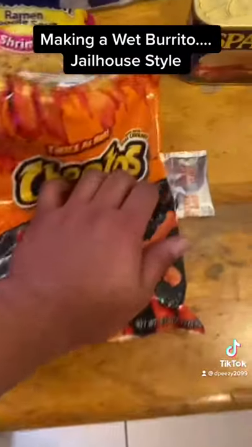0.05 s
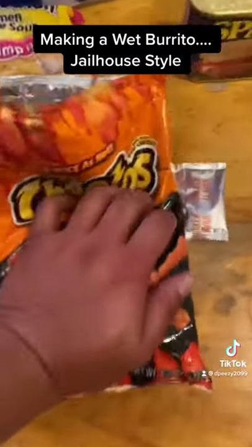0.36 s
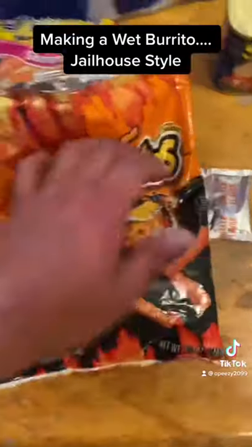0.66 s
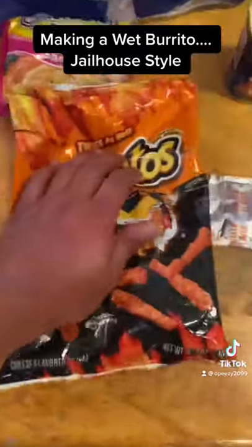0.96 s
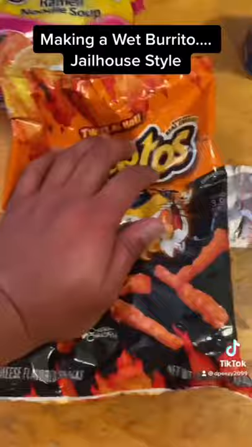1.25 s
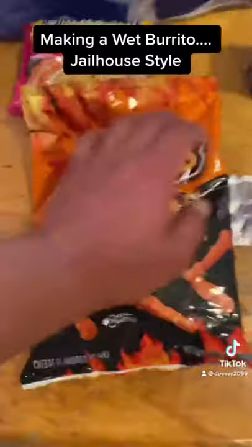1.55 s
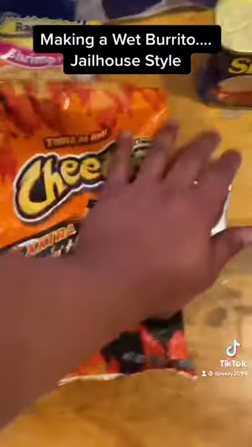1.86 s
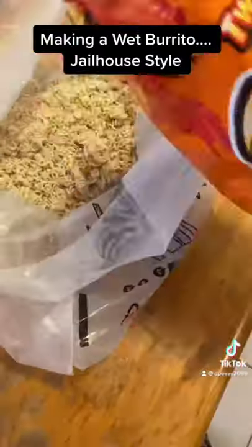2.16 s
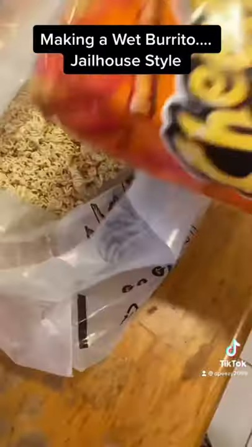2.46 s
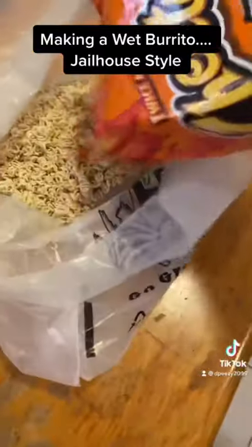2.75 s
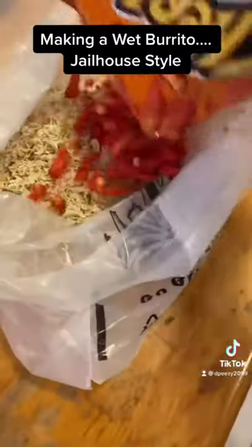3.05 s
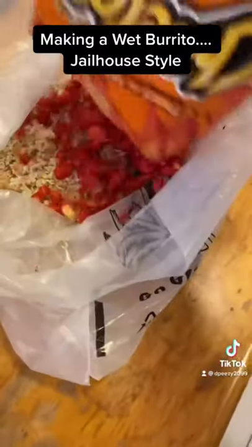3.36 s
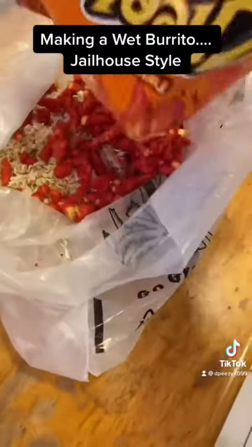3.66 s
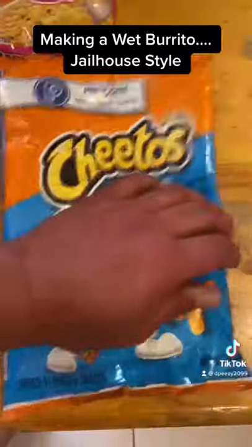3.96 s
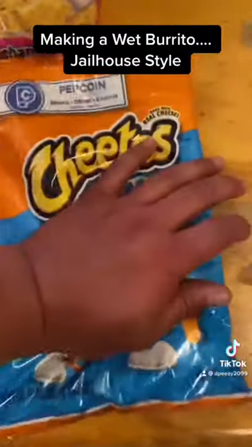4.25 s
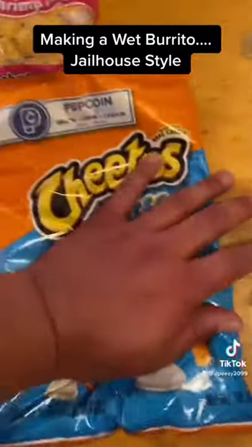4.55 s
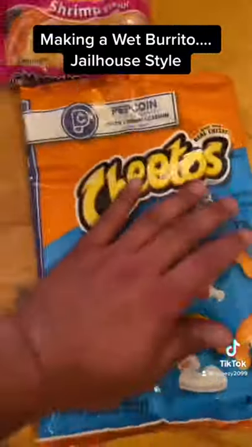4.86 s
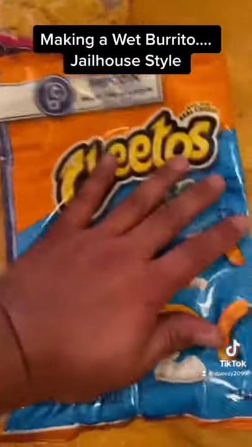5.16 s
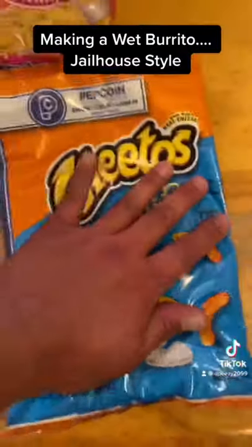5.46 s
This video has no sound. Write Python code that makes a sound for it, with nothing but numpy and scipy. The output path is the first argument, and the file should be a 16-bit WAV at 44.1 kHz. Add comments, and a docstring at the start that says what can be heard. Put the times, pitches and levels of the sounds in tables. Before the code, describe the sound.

A palm crushes chips inside a foil-plastic bag on a wooden table, in quick, uneven pushes full of crunches, sharp snaps, crinkling and soft low thuds. After a tiny gap, crumbs slide out and patter more softly onto dry noodles in a plastic bag. The pour fades, and a second bag is crushed with a similar crunch and crackle. Everything is close to the microphone in a small room.

```python
"""Corn chips fracture in swarms as a palm crushes them inside a foil-plastic bag on a wooden table.
Each break is an impulse that rings briefly: bright where chips lie free, muffled under the palm.
The collapse excites the low modes of the table, while creases in the film buckle and crackle.
One bag is crushed, crumbs patter into a plastic bag, and a second bag is crushed.
The three episodes are heard close up in a small room, with short silences between them."""
import sys
import numpy as np
from scipy import signal
from scipy.fft import rfft, irfft
from scipy.io import wavfile
from scipy.ndimage import uniform_filter1d

SR = 44100
rng = np.random.default_rng(int(sys.argv[2]) if len(sys.argv) > 2 else 0)


def put_to_file(sound):
    """Save the sound as 16-bit audio at rate SR, in the file named by the first command-line argument."""
    columns = np.atleast_2d(sound).T  # one column per channel
    safe = np.clip(columns, -1, 1)
    whole_steps = np.round(safe * 32767)
    wavfile.write(sys.argv[1], SR, whole_steps.astype(np.int16))


N = 246695
TIME = np.arange(N) / SR

# First crush, pour and second crush. Each row: start in seconds, end in seconds.
EPISODES = [(0, 2.193), (2.281, 3.893), (3.978, 5.559)]
# Spectra of the room noise, the film, the poured crumbs and the chips in each bag.
# Each row: frequency in Hz, relative level in dB.
ROOM_SPECTRUM = [(25, -9.5), (45, 10), (65, 14), (100, -1.5), (135, 4.5), (230, 1), (400, -5.5),
                 (540, -8.5), (650, -3.5), (900, -19), (2600, -13.5), (6000, -37), (10000, -44),
                 (15000, -53.5)]
FILM_SPECTRUM = [(7000, 6), (8500, 0), (10000, -7.5), (11200, -26), (12500, 1), (14000, -0.5),
                 (16000, -6.5)]
POUR_SPECTRUM = [(47, -36), (80, -1), (218, 2), (353, -5.5), (404, -3.5), (489, -5.5), (979, -3.5),
                 (1190, 0), (1440, -1.5), (2160, -5), (2520, -2.5), (4160, -9), (4850, -6), (8000, -19),
                 (10400, -49), (17600, -120)]
FIRST_SPECTRUM = [(150, -35), (250, -1.5), (321, -2.5), (475, -0.5), (546, -4), (645, -15), (701, 4),
                  (763, 4.5), (1130, -9.5), (1640, -7), (1910, -12), (3790, -14), (4300, -11), (5450, -17),
                  (7000, -18.5), (9100, -48), (15400, -120)]
SECOND_SPECTRUM = [(150, -35), (250, 3), (326, 1), (488, 7), (593, 3.5), (645, -4.5), (763, 10.5),
                   (1110, -10.5), (1370, -7.5), (1670, -12), (2140, -10.5), (3120, -10.5), (3740, -11.5),
                   (4800, -12), (7000, -15.5), (9100, -45), (15400, -120)]
# Early reflections from table and walls. Each row: delay in seconds, gain in dB.
REFLECTIONS = [(.0013, -51), (.0047, -23.5), (.0083, -27.5)]
# Modes of the table top with the bag's air cushion, and of the bag that receives the crumbs.
# Each row: frequency in Hz, bandwidth in Hz, relative gain in dB.
TABLE_MODES = [(73.8, 28, -11.5), (119.8, 9.9, 1.5), (134.9, 6.6, 1.5), (206, 14, -2.5), (225, 31, -11.5)]
RECEIVING_BAG_MODES = [(1190, 110, -6.5), (2590, 170, -3), (3080, 240, -3.5), (4700, 320, -16)]
# The stream of crumbs as the bag tips and drains. Each row: time in seconds, relative level in dB.
CRUMB_FLOW = [(2.29, -50), (2.41, -47), (2.62, -28.5), (2.87, -26), (3.16, -29.5), (3.42, -37), (3.6, -49),
              (3.88, -65.5)]
# Clumps that tumble out at once. Each row: start in seconds, relative level in dB.
CLUMPS = [(2.463, -32.5), (2.521, -27), (3.185, -21.5), (3.225, -26.5), (3.465, -41.5), (3.805, -52.5)]
# The loudest single snaps of chip or crease.
# Each row: start in seconds, relative level in dB, pitch in Hz, relative strength of the tick in dB.
LOUD_SNAPS = [(.0345, -23, 6000, -1), (.038, -15, 2500, -10), (0.13, -14, 2100, -8),
              (0.2014, -12.5, 2340, -5), (.252, -10.5, 1900, -14), (.355, -22, 6440, -2),
              (.401, -27, 6900, 7), (0.407, -17, 3400, -15), (0.4674, -20.5, 3846, -4),
              (0.5391, -10, 3535, -16), (0.733, -28, 3330, -23.5), (0.8168, -20, 4400, -22),
              (.8372, -12, 1700, -25), (0.8783, -17.5, 2973, -1.5), (0.953, -20, 2360, -5.5),
              (1.0, -20.5, 2440, 7), (1.058, -16, 4500, -1), (1.077, -12, 1700, -15),
              (1.097, -12.5, 3035, -7.5), (1.312, -32, 6510, -1), (1.33, -19.5, 2793, -20),
              (1.354, -27, 4216, -1), (1.39, -17.5, 3700, -10), (1.4788, -15, 2970, -10.5),
              (1.495, -20, 3530, -18), (1.5276, -19.5, 3200, -9), (1.603, -28.5, 2635, -11),
              (1.726, -26.5, 1100, -26), (1.768, -15.5, 4201, -10), (1.7767, -11.5, 3694, -6.5),
              (1.84, -11.5, 3770, -6.5), (1.9135, -10.5, 4708, -7), (1.9808, -11.5, 4432, -9.5),
              (2.154, -28, 3692, -11), (2.174, -26.5, 4560, -9), (2.446, -30.5, 2660, -19),
              (2.47, -22, 2300, -35), (2.486, -36, 2700, -23), (2.6087, -24, 2800, -27),
              (2.7308, -23, 1760, -26), (3.194, -25, 3080, -25), (3.458, -29, 2300, -26),
              (3.658, -40, 2380, -28), (4.0375, -22, 2900, -18), (4.079, -14.5, 3200, -32),
              (4.089, -20, 3440, -9), (4.1915, -25, 6200, -5), (4.2338, -21.5, 3550, -9.5),
              (4.3355, -13.5, 2130, -13), (4.5408, -19.5, 3900, -14), (4.656, -17.5, 2620, -16.5),
              (4.668, -26.5, 6600, -9), (4.836, -33, 3667, -12), (4.853, -27, 3924, -21),
              (5.0566, -19.5, 3322, -10.5), (5.1122, -14.5, 4500, -5), (5.128, -18, 3903, -6),
              (5.231, -19.5, 6900, 2), (5.341, -19.5, 2668, -2), (5.3966, -22, 3502, -5.5),
              (5.476, -21, 2418, -30), (5.51, -19, 2310, -27)]
# Shoves of the palm on each bag. Each row: start, rise and hold in seconds, then four relative levels
# in dB: free chips, muffling (buried over free chips), thud over buried chips, film over free chips.
FIRST_SHOVES = [(-.02, 0.031, 0.083, -26.5, 1, -3, -13.5), (.112, 0.0099, 0.047, -21.5, -1, -0.5, -10.5),
                (.18, 0.027, 0.054, -18, -1, -8, -10), (.25, 0.013, 0.063, -17, 1, -6.5, -9),
                (.42, 0.031, 0.06, -30.5, 0.5, -1.5, -10), (.52, .012, 0.026, -24.5, 4, -16, -12.5),
                (.57, 0.014, 0.034, -26, -2, -5.5, -11), (.675, 0.027, 0.042, -37, 5, 0, -14.5),
                (.8, 0.038, .025, -28, -0.5, -10, -13), (.868, 0.0097, .03, -21, -6, -7.5, -11.5),
                (.92, 0.01964, .04, -27, -1, -2.5, -11), (.988, .012, 0.048, -24, 0, -1.5, -10),
                (1.045, 0.031, 0.13, -20, 0, -2.5, -12.5), (1.21, .02, 0.11, -33, 4, -7, -14),
                (1.38, 0.019, 0.031, -26, 4, -6, -8.5), (1.45, .03, 0.0188, -26, -2.5, -4, -11.5),
                (1.515, 0.023, .055, -37, 8, -2.5, -14), (1.735, 0.039, .012, -22, -6.5, -4, -9),
                (1.8, .05, .115, -17.5, -1, 2, -10), (1.99, 0.023, .024, -20, -1, 1.5, -11.5),
                (2.1, 0.043, 0.048, -34, 2, -2, -9.5)]
SECOND_SHOVES = [(3.96, .11, .1, -27.5, -5, -4.5, -10), (4.21, 0.086, 0.055, -21, -2, -1.5, -9.5),
                 (4.355, .025, .022, -26, 0, 2.5, -5), (4.4, 0.022, .055, -35, 7, -17, -11),
                 (4.52, 0.034, .125, -31, 2, -5, -15.5), (4.83, 0.051, 0.026, -26.5, -7, -10, -9.5),
                 (4.91, .04, .12, -33, -3, -4, -8), (5.07, 0.039, 0.027, -23, -2, -1, -5.5),
                 (5.16, .04, .04, -29.5, 4, -12, -2.5), (5.27, 0.047, 0.031, -32, -6, -6, -5.5),
                 (5.357, .012, 0.076, -32.5, 7.5, -9.5, -4), (5.45, 0.041, 0.036, -32, 1, -6, -15.5)]

SNAP_S = .0026  # nominal duration of a snap
SETTLE_DB, SETTLE_S = -16, .17  # the pile goes on settling after a shove
RESTING_DB = -47  # the resting hand keeps a few chips breaking


def from_db(db):
    """Amplitude grows tenfold with every 20 dB."""
    return 10 ** (np.asarray(db) / 20)


def to_db(power):
    """Power grows tenfold with every 10 dB."""
    return 10 * np.log10(power + 1e-10)


def rms_one(x):
    """Normalisation brings the mean power to one."""
    return x / np.sqrt(np.mean(x ** 2) + 1e-20)


def gain_at(spectrum, hz):
    """Interpolation in dB over log frequency gives the gain of a spectrum."""
    known_hz, db = np.transpose(spectrum)
    return from_db(np.interp(np.log(hz), np.log(known_hz), db))


def band(x, low_hz, high_hz):
    """A band-pass filter attenuates what lies outside its two edges."""
    sections = signal.butter(2, [low_hz, min(high_hz, .45 * SR)], "band", fs=SR, output="sos")
    return signal.sosfilt(sections, x + 1e-18)


def resonate(x, hz, width_hz):
    """A damped resonator responds most, with unit gain, at its natural frequency."""
    radius = np.exp(-np.pi * width_hz / SR)
    feedback = [1, -2 * radius * np.cos(2 * np.pi * hz / SR), radius ** 2]
    return signal.lfilter(np.array([1, 0, -1]) * (1 - radius ** 2) / 2, feedback, x + 1e-18)


def evened(x, window_s):
    """Division by the running rms steadies the slow level and keeps the fast grain."""
    size = int(window_s * SR)
    power = uniform_filter1d(uniform_filter1d(x ** 2, size), size)
    return x / np.sqrt(np.maximum(power, 0) + 1e-3 * np.mean(x ** 2))


def envelope(start_s, rise_s, hold_s, release_s):
    """The amplitude rises linearly, holds, then decays exponentially."""
    t = TIME - start_s
    return np.clip(t / rise_s, 0, 1) * np.exp(-np.clip((t - rise_s - hold_s) / release_s, 0, 30))


def impulses(per_s, spread_db):
    """Independent events form a Poisson process, many small and few large: sample indices and sizes."""
    at = np.flatnonzero(rng.random(N) < per_s / SR)
    return at, from_db(spread_db * np.minimum(rng.exponential(1, N)[at], 4.5))


def event_rate(peak_per_s, level_db, exponent):
    """The number of events a second follows a power law of the amplitude."""
    return peak_per_s * from_db(exponent * (level_db - level_db.max()))


def splinter(clicks, decay_s, share):
    """Each break sheds finer splinters, a noise whose energy decays exponentially."""
    decay = np.exp(-1 / (decay_s * SR))
    energy = signal.lfilter([1 - decay], [1, -decay], clicks ** 2 + 1e-18)
    return clicks + share * np.sqrt(energy) * rng.standard_normal(N)


def grains(events, spectrum, low_hz, high_hz, variety_db, bands):
    """An impulse is broadband: it excites every band, each with a random strength of its own."""
    at, sizes = events
    out, edges = np.zeros(N), np.geomspace(low_hz, high_hz, bands + 1)
    for low, high in zip(edges, edges[1:]):
        clicks = np.zeros(N)
        signs = rng.choice([-1, 1], len(at))
        clicks[at] = sizes * signs * from_db(variety_db * rng.standard_normal(len(at)))
        spray = splinter(clicks, decay_s=.005, share=.96)
        out += gain_at(spectrum, np.sqrt(low * high)) * band(spray, low, high)
    return out


def room_tone(level_db):
    """Stationary noise, weighted to the bass, gives the room its rumble and faint hiss."""
    hz = np.maximum(np.fft.rfftfreq(N, 1 / SR), 1)
    spectrum = rfft(rng.standard_normal(N)) * gain_at(ROOM_SPECTRUM, hz)
    return from_db(level_db) * rms_one(irfft(spectrum, N))


def reverberation(x, t60_s, tail_db):
    """Convolution with the room's impulse response gives early reflections and a diffuse tail."""
    t = TIME[:SR // 3]
    tail = band(rng.standard_normal(len(t)), 220, 11000) * from_db(-60 * t / t60_s) * (t > .005)
    response = from_db(tail_db) * tail / np.sqrt(np.sum(tail ** 2))
    for delay_s, db in REFLECTIONS:
        response[round(delay_s * SR)] += from_db(db)
    return signal.fftconvolve(x, response)[:N]


def film_swish(start_hz, fall_hz_per_s, width_hz, level_db):
    """Friction of film on film makes narrow-band noise, which falls in pitch as the bag slows."""
    start_s, hold_s = EPISODES[1][0], .097
    hz = start_hz - fall_hz_per_s * np.clip(TIME - start_s, 0, 2 * hold_s)
    phase = 2 * np.pi * np.cumsum(hz) / SR
    wander = signal.sosfilt(signal.butter(2, width_hz, fs=SR, output="sos"), rng.standard_normal((2, N)))
    gain = from_db(level_db) * envelope(start_s, .0038, hold_s, release_s=.05)
    return gain * rms_one(wander[0] * np.cos(phase) + wander[1] * np.sin(phase))


def table_thud(level_db):
    """Collapsing chips jolt the palm against the table, and each impact excites its damped modes."""
    at, sizes = impulses(per_s=420, spread_db=1)
    out = np.zeros(N)
    for hz, width_hz, db in TABLE_MODES:
        jolts = np.zeros(N)
        jolts[at] = sizes * rng.standard_normal(len(at))
        out += from_db(db) * resonate(jolts, hz, width_hz)
    return from_db(level_db) * evened(out, window_s=.051)


def film_crackle(level_db, breaks):
    """Creases in thin film buckle with sharp ticks: a fine fizz, and a crack where a chip gives way."""
    creases = impulses(event_rate(2600, level_db, exponent=.12), spread_db=4)
    fizz = rms_one(grains(creases, FILM_SPECTRUM, 6870, 16460, variety_db=1.5, bands=7))
    at, sizes = breaks
    cracks = rms_one(grains((at, sizes ** 1.4), FILM_SPECTRUM, 7430, 15800, variety_db=5, bands=4))
    return from_db(level_db) * evened(fizz + from_db(-1.5) * cracks, window_s=.029)


def snaps(rows):
    """A brittle crack opens in one sharp step, then dying ones; it rings the piece and ticks the film."""
    t = TIME[:4096]
    out = np.zeros(N + len(t))
    for start_s, level_db, hz, tick_db in rows:
        steps = rng.standard_normal((3, len(t))) * from_db(6.2 * rng.standard_normal((3, len(t))))
        steps[:, 0] = 6.3 * rng.choice([-1, 1])  # the opening step
        crack = steps[:2] * np.exp(-t / (.8 * SNAP_S))
        ring = rms_one(resonate(band(crack[0], 400, 5300), hz, width_hz=.35 * hz))
        body = rms_one(band(crack[1], hz / 4.9, 1.49 * hz))
        flick = steps[2] * np.exp(-t / (.38 * SNAP_S))
        tick = rms_one(band(flick, 6400, 8800) + from_db(-4.5) * band(flick, 12250, 16500))
        snap = rms_one(ring + from_db(-4) * body + from_db(tick_db + 4) * tick)
        start = round(start_s * SR)
        out[start:start + len(t)] += from_db(level_db) * np.sqrt(SNAP_S / t[-1]) * snap
    return out[:N]


def stray_snaps(level_db, per_s, tick_db, low_hz=1700, high_hz=5500):
    """Moving chips snap as a Poisson process, each with its own size, pitch and sharpness."""
    at = np.flatnonzero(rng.random(N) < per_s / SR)
    at = at[level_db[at] > level_db.min() + 3]
    softness, pitch, sharpness = rng.random((len(at), 3)).T
    db = level_db[at] - .5 - 4 * softness
    hz = low_hz * (high_hz / low_hz) ** pitch
    return snaps(zip(at / SR, db, hz, tick_db + 6 * (2 * sharpness - 1)))


def pouring():
    """Crumbs slide over film and land on dry noodles in a plastic bag; their impacts add in power."""
    flow_power = from_db(np.interp(TIME, *np.transpose(CRUMB_FLOW))) ** 2
    clump_power = sum((from_db(db) * envelope(start_s, rise_s=.008, hold_s=.015, release_s=.025)) ** 2
                      for start_s, db in CLUMPS)
    slide_db = to_db(flow_power + clump_power)
    land_db = to_db(flow_power + from_db(-2) ** 2 * clump_power)
    film_db = slide_db - 15 + .3 * (slide_db - slide_db.max())
    landings = impulses(per_s=1200, spread_db=.5)
    patter = grains(landings, POUR_SPECTRUM, 85, 940, variety_db=4.5, bands=8)
    crumbs = impulses(event_rate(800, slide_db, exponent=.2), spread_db=3)
    rustle = grains(crumbs, POUR_SPECTRUM, 963, 7750, variety_db=2.5, bands=12)
    bag_ring = sum(from_db(db) * resonate(rustle, hz, width) for hz, width, db in RECEIVING_BAG_MODES)
    stream = (from_db(land_db - 7.5) * evened(patter, window_s=.031)
              + from_db(slide_db - .64) * evened(rustle + from_db(-3) * bag_ring, window_s=.047))
    return stream + film_crackle(film_db, crumbs) + stray_snaps(slide_db, per_s=55, tick_db=-39)


def air_pocket(hz, breaks, decay_s):
    """Buried breaks excite a cavity resonance under the palm, whose pitch shifts with each push."""
    at, sizes = breaks
    kicks = np.zeros(N, complex)
    kicks[at] = sizes * np.exp(2j * np.pi * rng.random(len(at)))
    ringing = signal.lfilter([1], [1, -np.exp(-1 / (decay_s * SR))], kicks + 1e-18)
    carrier = np.exp(2j * np.pi * np.cumsum(hz) / SR)
    return band(np.real(ringing * carrier), 280, 1150)


def shove_level(shoves, offset_db, lag_s, slowness, release_s):
    """Incoherent sounds add in power: shoves build, hold and settle to give one layer's level in dB."""
    layer_db = np.array(shoves)[:, 3] + offset_db
    power = from_db(RESTING_DB + np.mean(offset_db)) ** 2
    for (start_s, rise_s, hold_s, *_), db in zip(shoves, layer_db):
        build_s = min(slowness * rise_s, rise_s + hold_s)
        timing = start_s + lag_s, build_s, rise_s + hold_s - build_s
        shape = np.maximum(envelope(*timing, release_s), from_db(SETTLE_DB) * envelope(*timing, SETTLE_S))
        power = power + (from_db(db) * shape) ** 2
    return to_db(power)


def crushing(shoves, spectrum, pocket_hz):
    """Brittle fracture sounds bright in the open, dull under the palm; film leads and the table lags."""
    muffling, thud, crackle = np.transpose(shoves)[4:]
    free_db = shove_level(shoves, 0, lag_s=0, slowness=1, release_s=.03)
    buried_db = shove_level(shoves, muffling, lag_s=.002, slowness=1.1, release_s=.035)
    bright_db = shove_level(shoves, -.2 * muffling, lag_s=.0026, slowness=.92, release_s=.029)
    film_db = shove_level(shoves, crackle - .18 * muffling, lag_s=-.0017, slowness=1, release_s=.02)
    thud_db = shove_level(shoves, muffling + thud, lag_s=.0045, slowness=1.15, release_s=.04)
    buried = impulses(event_rate(750, buried_db, exponent=.3), spread_db=3.5)
    free = impulses(event_rate(1600, free_db, exponent=.2), spread_db=4.5)
    dull = rms_one(grains(buried, spectrum, 248.2, 1108, variety_db=7, bands=9))
    ring_hz = pocket_hz * 2 ** (.3 * (buried_db - free_db))  # rises 0.3 octave per dB of muffling
    pocket = rms_one(air_pocket(ring_hz, buried, decay_s=.0014))
    crunch = grains(free, spectrum, 1025, 3194, variety_db=1, bands=6)
    bright = grains(free, spectrum, 3064, 6800, variety_db=5, bands=6)
    chips = (from_db(buried_db) * evened(dull + from_db(-5.5) * pocket, window_s=.021)
             + from_db(free_db - 2.5) * evened(crunch, window_s=.022)
             + from_db(bright_db - 5) * evened(bright, window_s=.027))
    return (table_thud(thud_db) + chips + film_crackle(film_db - 1.86, free)
            + stray_snaps(free_db, per_s=22, tick_db=-4))


def scene():
    """Direct sound, reverberation and room noise superpose in three episodes: crush, pour, crush."""
    first, pour, second = [uniform_filter1d(1. * ((TIME >= start_s) & (TIME < end_s)), size=64)
                           for start_s, end_s in EPISODES]
    direct = first * crushing(FIRST_SHOVES, FIRST_SPECTRUM, pocket_hz=732)
    direct += pour * pouring()
    direct += pour * film_swish(start_hz=3580, fall_hz_per_s=2500, width_hz=260, level_db=-51.5)
    direct += second * crushing(SECOND_SHOVES, SECOND_SPECTRUM, pocket_hz=634.4)
    direct += from_db(-2) * snaps(LOUD_SNAPS)
    mix = direct + reverberation(direct, t60_s=.28, tail_db=-13) + room_tone(level_db=-45)
    return (mix * (first + pour + second))[None]


def record(dry):
    """A small microphone passes a limited band, and its soft saturation rounds the highest peaks."""
    thin = signal.sosfilt(signal.butter(2, 42, "high", fs=SR, output="sos"), dry)
    rounded = 1.297 * np.tanh(thin / 1.262)
    return signal.sosfilt(signal.ellip(10, .1, 80, 16000, fs=SR, output="sos"), rounded)


dry = scene()
out = record(dry)
put_to_file(out)
```